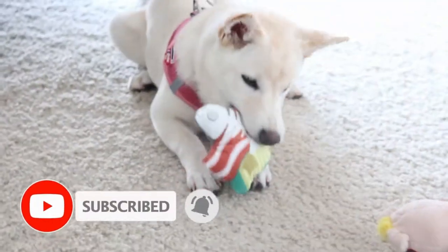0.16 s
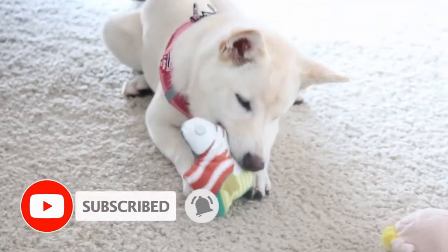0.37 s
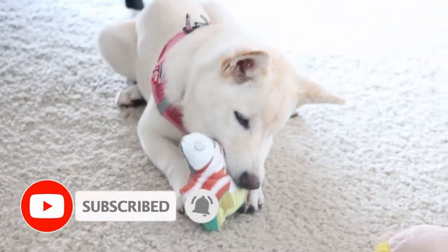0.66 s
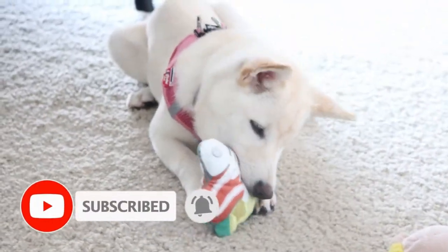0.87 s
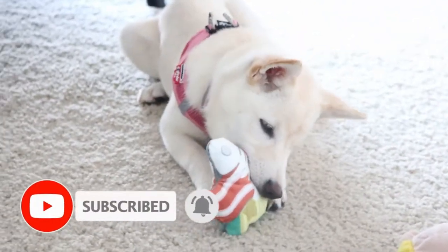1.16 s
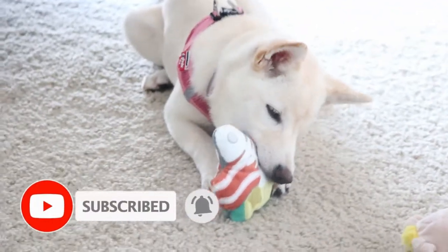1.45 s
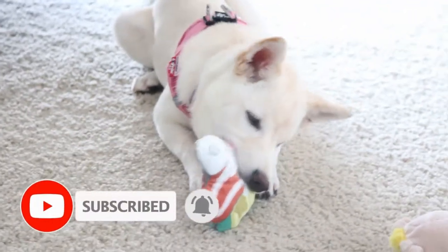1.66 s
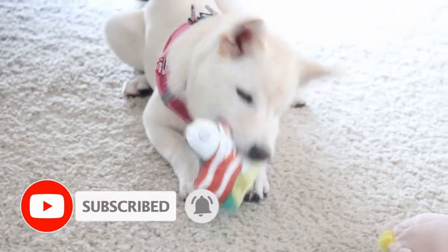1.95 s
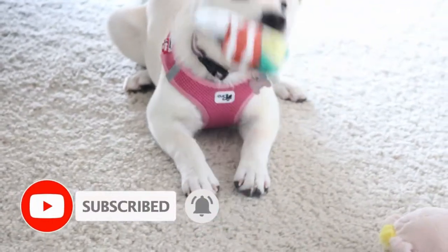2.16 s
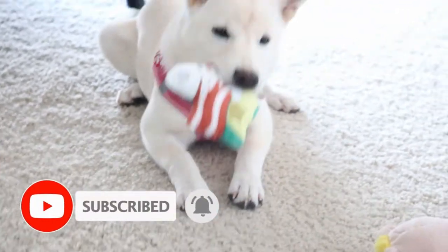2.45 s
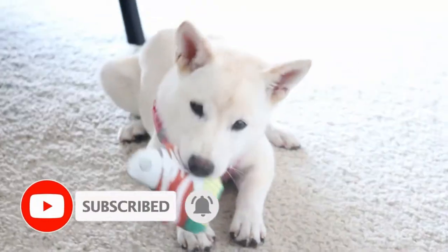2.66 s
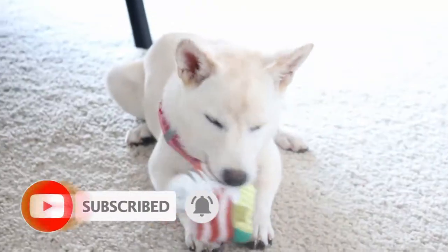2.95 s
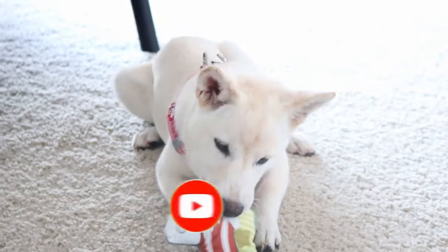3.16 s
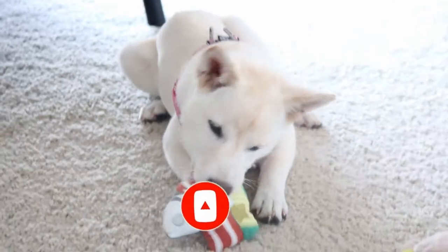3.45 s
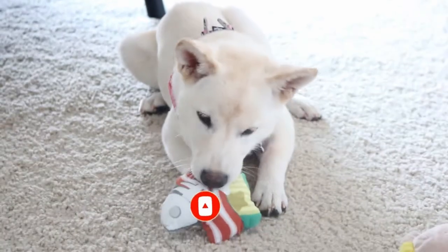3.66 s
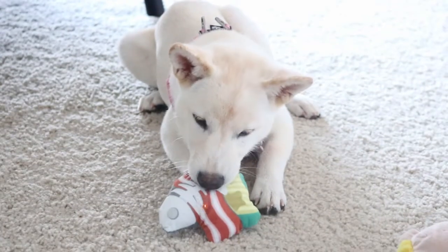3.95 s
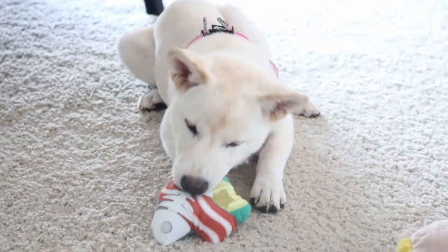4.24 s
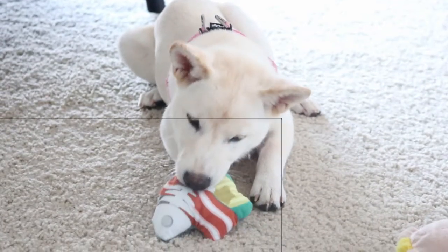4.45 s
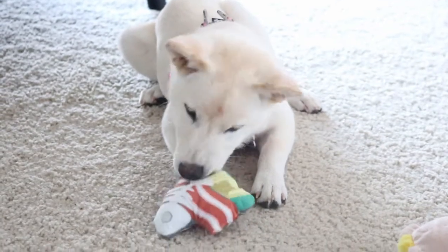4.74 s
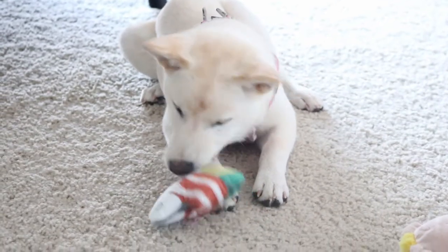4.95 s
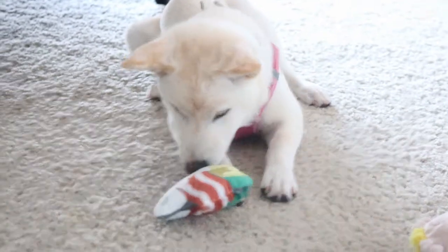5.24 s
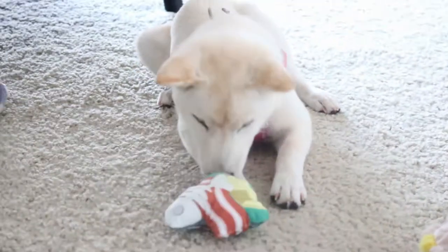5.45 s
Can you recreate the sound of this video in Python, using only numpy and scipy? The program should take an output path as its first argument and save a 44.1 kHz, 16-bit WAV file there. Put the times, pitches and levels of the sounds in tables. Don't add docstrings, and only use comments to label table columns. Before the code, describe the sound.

A puppy chews a plush squeaker toy on carpet, giving short uneven nasal squeaks and popping snaps over a faint room hum.

```python
import sys
import numpy as np
from scipy import signal
from scipy.fft import rfft, irfft
from scipy.io import wavfile
from scipy.ndimage import uniform_filter1d

SR = 44100
rng = np.random.default_rng(int(sys.argv[2]) if len(sys.argv) > 2 else 0)


def master_out(mix):
    frames = np.transpose(np.atleast_2d(mix))
    ceiling = np.clip(frames, -1, 1)
    pcm = np.round(ceiling * 32767).astype(np.int16)
    wavfile.write(sys.argv[1], SR, pcm)


def magnitude_from_level(level_db):
    exponent = np.asarray(level_db, float) / 20
    return 10 ** exponent


N = 246777
LEAD = 4410
CATCH_S = 0.0064


def evened(x):
    return x / np.sqrt(np.mean(x ** 2) + 1e-20)


def read(points, hz):
    f, value = np.transpose(points)
    return np.interp(np.log(hz + 1), np.log(f + 1), value)


def add(mix, s, sound):
    part = mix[:, round(s * SR) + LEAD:][:, :sound.shape[-1]]
    part += sound[..., :part.shape[1]]


def band(x, hz, width):
    return signal.lfilter(*signal.iirpeak(hz, hz / min(width, SR * 3 / 8), SR), x)


def peak(hz, centre_hz, width):
    return 1 / (1 + (2 * (hz - centre_hz) / width) ** 2)


# (f/Hz, level/dB per Hz)
HUM_COLOUR = [(24, -58), (40, -20.5), (84, -3.5), (151, -18.5), (189, -13), (214, -15), (416, -17),
              (588, -23.5), (1060, -26.5), (2280, -32), (2850, -33), (3220, -31), (3560, -34),
              (14500, -40.5)]
# (f/Hz, likeness 0-1)
HUM_LIKENESS = [(60, 0.99), (180, 0.81), (550, 0.67), (1650, 0), (4970, 0.0), (15000, 0.13)]
# (f/Hz, width/Hz, level/dB)
DRONES = [(89.2, 12, -81.5), (124.3, 27, -77), (437.7, 45, -83.5)]


def hum():
    frames, hz = N // 512 + 5, np.fft.rfftfreq(2048, 1 / SR)
    a, b, c, d, patches = rng.standard_normal((frames, 1025, 5)).T
    patches = uniform_filter1d(patches, size=16, axis=0)
    patches = evened(uniform_filter1d(patches, size=7, axis=1))
    same = read(HUM_LIKENESS, hz)[:, None]
    left = a + 1j * b
    right = same * left + np.sqrt(1 - same ** 2) * (c + 1j * d)
    z = np.array([left, right]) * magnitude_from_level(read(HUM_COLOUR, hz)[:, None] + 1.1 * patches)
    wash = magnitude_from_level(-68) * evened(signal.istft(z, nperseg=2048, noverlap=1536)[1][:, :N])
    for f, width, db in DRONES:
        drone = band(band(rng.standard_normal(N), f, width), f, width)
        wash = wash + magnitude_from_level(db) * evened(drone)
    return wash


def stroke(rows, grip, pose):
    rise_s, fall_s, jitter = 0.0016, 0.007, 0.002
    s, *columns = np.transpose(rows)
    tilt_db, cheek_db, ring_hz, width, open_db = grip
    upper_db, notch_hz, depth, room_db = pose
    air_db = np.interp(ring_hz, (7350, 7750), (-22, -27.5))
    lean_db = np.interp(ring_hz, (7350, 7750), (1.5, 0.79))
    t = np.arange(s[0], s[-1], 1 / SR)
    db, hz, ring_db = (np.interp(t, s, c) for c in columns)
    ring_db = ring_db + open_db

    drift, hiss = rng.standard_normal((2, len(t)))
    wobble = evened(uniform_filter1d(drift, size=130))
    turns = np.cumsum(uniform_filter1d(hz, size=60) * (1 + jitter * wobble)) / SR
    k = np.arange(1, 19)[:, None]
    f = k * hz
    slaps = np.exp(1j * (2 * np.pi * k * turns + 0.033))

    cheek = magnitude_from_level(cheek_db) * peak(f, 4050, 4400)
    low = magnitude_from_level(tilt_db * np.log2(k)) / (1 + (f / 4000) ** 6) + cheek
    upper_ring = magnitude_from_level(upper_db) * peak(f, 10500, 3900)
    ring = peak(f, ring_hz, width) / (1 + (f / (ring_hz + width)) ** 8) + upper_ring
    low, ring = (g / np.sqrt((g ** 2).sum(0).mean() / 2) for g in (low, ring))
    ring = magnitude_from_level(ring_db) * ring

    air = hiss * (0.23 + np.exp(-(turns % 1) / 0.14))
    pipe_air = evened(band(band(air, ring_hz, 2 * width), ring_hz, 6.6 * width))
    air = magnitude_from_level(air_db) * (magnitude_from_level(ring_db) * pipe_air + 2.43 * evened(band(air, 1700, 4700)))

    dip = 1 - depth * peak(f, notch_hz, 1030)
    near = (dip * (low - ring) * slaps).imag.sum(0) + magnitude_from_level(-6) * air
    far_ring = 1j * ring * magnitude_from_level(2.7 * np.log2(f / ring_hz))
    far = ((low + far_ring) * slaps).imag.sum(0) + air
    fade = np.clip(np.minimum((t - t[0]) / rise_s, (t[-1] - t) / fall_s), 0, 1)
    balance = magnitude_from_level(np.array([[lean_db / 2], [-lean_db / 2], [room_db]]))
    return s[0], magnitude_from_level(db) * fade * [near, near, far] * balance


# (f/Hz, t60/s)
ROOM_RING = [(200, 0.31), (800, 0.41), (2000, 0.38), (5000, 0.37), (8000, 0.36), (13000, 0.37)]
# (f/Hz, level/dB)
ROOM_ANSWER = [(200, 9.5), (800, 5), (1200, 8), (2000, 0.5), (5000, 2.5), (8800, 5.5), (9600, 4),
               (13000, 4.5)]
# (f/Hz, share 0-1)
ECHO_SHARED = [(200, 0.82), (800, 0.3), (2000, 0.025), (8000, 0.024)]


def room(x):
    out, turn = 0, np.arange(len(x)) / SR * 2.3
    for k in range(3):
        taps = np.zeros((2, SR))
        at = np.arange(200, SR - 40, 20) + rng.integers(0, 20, (2, (SR - 221) // 20))
        np.put_along_axis(taps, at, rng.choice([-1., 1.], at.shape), 1)
        hz, t, z = signal.stft(taps, SR, nperseg=256)
        z = z * magnitude_from_level(read(ROOM_ANSWER, hz)[:, None] - 60 * t / read(ROOM_RING, hz)[:, None])
        z = z * (1 - 0.65 * np.exp(-t / 0.018))
        z = z + read(ECHO_SHARED, hz)[:, None] * z[::-1]
        tail = signal.istft(z, SR, nperseg=256)[1]
        feed = x * np.sqrt(2 / 3) * np.cos(np.pi * (turn + k / 3))
        out = out + signal.fftconvolve(feed[None], tail / 30, axes=1)[:, :len(x)]
    return out


# (f/Hz, lead/radians)
PORT_BALANCE = [(800, 0.5), (1600, -7), (2400, -4.5), (3300, -6), (4000, -1.5), (4800, 12), (5700, -2),
                (7300, -5), (9000, -2), (12000, -5.5)]
PORT_PHASE = [(800, -0.35), (4400, -0.4), (5500, -1.23), (7500, -0.84), (9500, -2.08), (12000, 0.076),
              (15000, -2.2)]


def two_ports(toy):
    hz = np.fft.rfftfreq(N + LEAD, 1 / SR)
    port = magnitude_from_level(read(PORT_BALANCE, hz) / 2) * np.exp(.5j * read(PORT_PHASE, hz))
    return irfft(rfft(toy) * [port, 1 / port], N + LEAD)


# (t/s, length/s, level/dB, f/Hz)
SUCK_BACKS = [
    (0.033, 0.027, -40.5, 754),
    (1.15, 0.031, -43.5, 777),
    (1.693, 0.035, -41, 794.4),
    (2.225, 0.031, -36.5, 787),
    (3.179, 0.033, -43, 789),
    (3.623, 0.049, -48.5, 794),
]


def suck(s, length, db, hz):
    run = length - CATCH_S
    return [(s, db + 0.5, hz + 49.4, -4), (s + CATCH_S, db, hz, 0),
            (s + length, db - 540 * run, hz - 4150 * run, -244 * run)]


# (t/s, level/dB, f/Hz)
JAW_SQUEEZES = [
    [(.129, -48.5, 782), (.145, -46.5, 793), (.17, -50, 758), (.2, -46.5, 784.6), (.235, -53.5, 693.4),
     (.252, -58, 744), (.258, -45.5, 829)],
    [(.412, -44, 752.4), (.428, -52, 752), (.436, -49, 745)],
    [(.604, -41, 846), (.625, -47, 774), (.66, -47, 771), (.7, -52, 731), (.76, -53.5, 715.6),
     (.768, -49.5, 771)],
    [(2.86, -44.5, 834.4), (2.875, -42.5, 844.5), (2.895, -46.5, 808), (2.915, -47.5, 803)],
    [(3.257, -46, 804.6), (3.272, -48, 806.5), (3.285, -45.5, 858.4)],
    [(3.96, -46.5, 806), (3.975, -46, 822.5), (4.001, -46.5, 804), (4.007, -41.5, 867.5)],
    [(4.437, -44.5, 862), (4.45, -39.5, 917.6), (4.462, -39, 932.4), (4.48, -43, 882), (4.497, -41, 821),
     (4.506, -49, 851.5), (4.514, -40, 912)],
]


def squeeze(curve):
    rows = [(*row, 0) for row in curve]
    caught = np.add(rows[0], (-CATCH_S, -2, -27.5, 0))
    let_go = np.add(rows[-1], (0.0152, -6, -99, 0))
    return [caught, *rows, let_go]


# (t/s, peak level/dB, f/Hz, t60/s)
KNOCKS = [
    (0.21, -44.5, 192, 0.05),
    (0.818, -42, 455, 0.0095),
    (1.44, -46.5, 284, 0.0096),
    (2.175, -55, 152, 0.027),
    (2.19, -48.5, 440, 0.03),
    (2.351, -43, 234, 0.0062),
    (4.509, -45, 360, 0.014),
    (5.276, -44, 258, 0.024),
    (5.32, -76, 267, 0.027),
]


def knock(db, hz, t60):
    t = np.arange(3000) / SR
    return magnitude_from_level(db - 60 * t / t60) * np.sin(2 * np.pi * hz * t) * np.minimum(t / 0.00071, 1)


# (t/s, peak level/dB, centre
# f/Hz, length/s)
TICKS_AND_PUFFS = [(0.263, -56, 1200, 0.0053), (.259, -55, 7540, .006), (.428, -53, 2500, 0.003),
                   (1.44, -60.5, 660, 0.01), (1.445, -64.5, 2550, 0.0039), (1.487, -75, 1510, 0.0032),
                   (1.693, -49.5, 1230, 0.0047), (2.178, -56, 1930, 0.0043), (2.192, -45.5, 2290, 0.0014),
                   (2.225, -54, 1410, 0.0061), (2.56, -73, 1500, 0.0033), (3.179, -51, 1190, 0.0036),
                   (4.515, -52.5, 1340, 0.0041), (5.2732, -59.5, 2180, 0.0016), (5.278, -61, 685, 0.0058),
                   (5.278, -63.5, 2000, 0.0024), (5.323, -70, 2600, 0.0037), (5.325, -72, 1800, 0.003)]


def tick(db, hz, length):
    t = np.arange(2000) / SR
    scratch = rng.standard_normal(len(t))
    for width in (1.2, 1.54, 3.8):
        scratch = band(scratch, hz, width * hz)
    return magnitude_from_level(db + 5.5) * evened(scratch) * np.exp(-t / length) * np.minimum(t / 0.00071, 1)


def on_carpet(sound):
    return sound * magnitude_from_level(np.array([[0], [0], [-2]]))


# (t/s, push length/s, push level/dB, push f/Hz, f before the flip/Hz)
HARD_BITES = [
    (.345, 0.02, -39, 805.7, 882.6),
    (1.064, .018, -37, 820, 883),
    (3.464, 0.019, -43, 782, 779),
    (3.706, .0145, -42, 776, 783),
    (4.219, 0.02, -41.5, 806, 767),
]
# (t/s, level/dB, f/Hz, ring level/dB), all added to the flip's
COLLAPSE = [
    (.012, -2.5, -125., 1.5),
    (.026, -4.5, -192., -13),
]


def snap(s, push, db, hz, strained_hz):
    extra_db = db + 42
    flip, flip_hz = s + push, 885.5 + 8 * extra_db
    return [(s, db - 2.5, hz - 13.5, 0), (s + CATCH_S, db, hz, 0),
            (flip - 0.0028, db - 0.7, strained_hz, 2.5),
            (flip, db + 8 - 0.27 * extra_db, flip_hz, -1),
            *np.add((flip, db, flip_hz, 0), COLLAPSE)]


# (level/dB, f/Hz, t60/s)
WALL_POPS = [
    (-34, 512, 0.0098),
    (-37.5, 1085, 0.013),
]


def flip_pops(toy):
    for s, push, *_ in HARD_BITES:
        flip = s + push - 0.002
        for wall in WALL_POPS:
            add(toy, flip, on_carpet(knock(*wall)))
        add(toy, flip, on_carpet(tick(-65, 660, 0.0017)))


# (t/s, level/dB, f/Hz, ring level/dB)
OPENING_SQUEAK = [(-.05, -44., 800, 0.), (-.02, -48., 740, 0.)]
# (low tilt/dB per octave, cheek level/dB, pipe ring f/Hz, ring width/Hz, ring level/dB over the low tones)
JAW_GRIPS = [(2, 7.5, 5700, 3300, 2), (-4, -22, 8080, 2400, -6), (2, -9, 7240, 5300, 1.2),
             (-1, -8, 6400, 2600, 1), (-1.5, -17, 7970, 2100, -8), (1.1, -4.5, 6400, 4200, -2.1),
             (1.5, -19, 6700, 2200, -4), (0.2, -11, 7400, 3700, -2.5), (7, -14, 6780, 3400, 2.3),
             (-1.5, -17, 8330, 1500, -3.5), (-3.5, -7, 6600, 3700, 3), (-3.5, -12, 8130, 2200, -4),
             (-4, -4, 6770, 4100, 1.5), (-6.5, -15, 7800, 2200, -4.5), (-10, 2.5, 6540, 3260, 2.5),
             (-5.5, -12.5, 7880, 2400, -4.5), (-8., -0.5, 6450, 3450, -0.3), (-7.5, -11, 7830, 1800, -6)]
# (upper ring level/dB, floor-echo notch f/Hz, notch depth 0-1, room share
# level/dB)
HEAD_POSES = [(-9, 2260, 0.74, -4.5), (-14, 3040, 0.3, 0.8), (-18, 3400, 0.4, -1.1), (-18, 1500, 0.1, -0.2),
              (-11.5, 4560, 0.82, -0.4), (-34, 7000, 0.24, -3.5), (-17, 5800, .05, -1.4),
              (-19, 9200, .05, -1.2), (-16.5, 2900, 0.37, -2.5), (-19, 2260, 1, -0.3),
              (-19, 2300, 0.35, -1.5), (-12, 3600, 1, 0.4), (-36, 2400, 0.14, -3.5), (-14, 3600, 0.64, 2),
              (-20, 3320, 0.7, -3), (-13, 3300, 0.7, 0.6), (-18, 2930, 0.85, -2.5), (-12, 3080, 0.54, 0)]


def chew(toy):
    s, sound = stroke(OPENING_SQUEAK, (-20, 3.5, 7000, 2500, 1.5), (-15, 3000, .1, 7.5))
    add(toy, s, magnitude_from_level(-2) * sound)
    bites = [suck(*row) for row in SUCK_BACKS]
    bites += [squeeze(curve) for curve in JAW_SQUEEZES]
    bites += [snap(*row) for row in HARD_BITES]
    bites.sort(key=lambda rows: rows[0][0])
    for bite, grip, pose in zip(bites, JAW_GRIPS, HEAD_POSES):
        add(toy, *stroke(bite, grip, pose))


def scene():
    toy = np.zeros((3, N + LEAD))
    chew(toy)
    for s, *how in KNOCKS:
        add(toy, s, on_carpet(knock(*how)))
    for s, *how in TICKS_AND_PUFFS:
        add(toy, s, on_carpet(tick(*how)))
    flip_pops(toy)
    heard = two_ports(toy[:2]) + magnitude_from_level(3.5) * room(toy[2])
    return heard[:, LEAD:] + hum()


def band_limit(x):
    return signal.sosfilt(signal.butter(12, 15650, fs=SR, output="sos"), x)


# (f/Hz, level/dB)
MIC_RESPONSE = [(30, -4.5), (50, 0.5), (6000, 1), (8900, 0.5), (9600, -0.5), (12500, -4.5), (13200, -7),
                (15000, -2.5), (16000, -25)]


def record(dry):
    response = magnitude_from_level(read(MIC_RESPONSE, np.fft.rfftfreq(N, 1 / SR)))
    heard = irfft(rfft(dry) * response, N)
    return band_limit(heard)


dry = scene()
out = record(dry)
master_out(out)
```